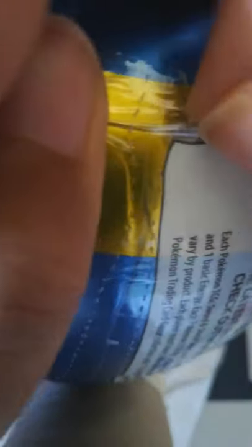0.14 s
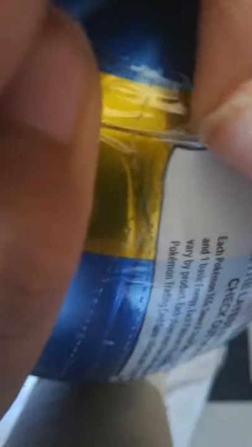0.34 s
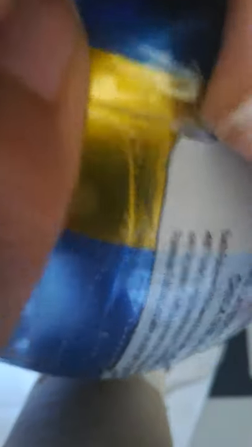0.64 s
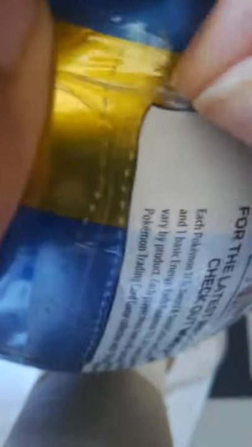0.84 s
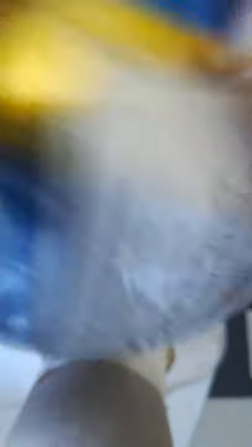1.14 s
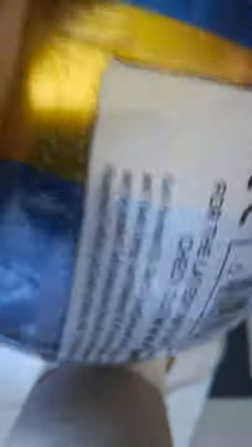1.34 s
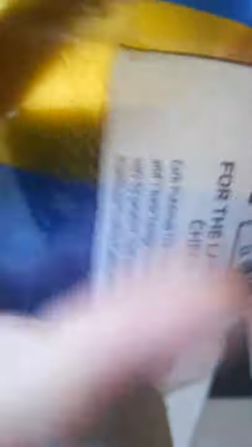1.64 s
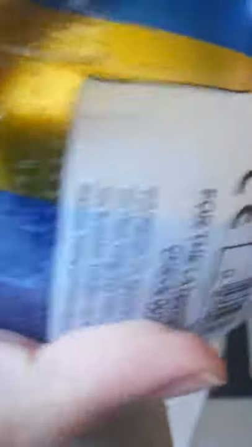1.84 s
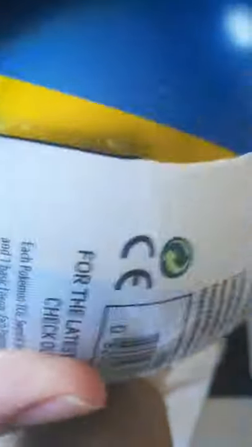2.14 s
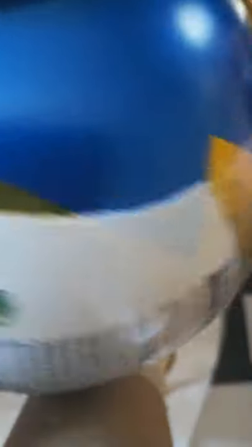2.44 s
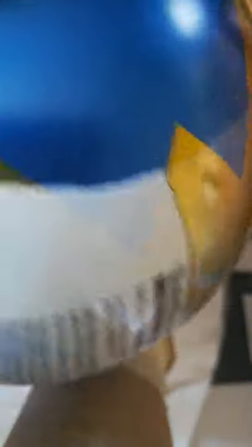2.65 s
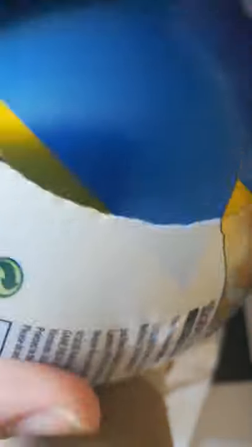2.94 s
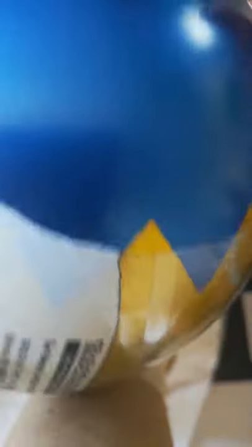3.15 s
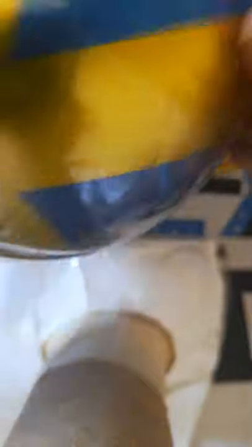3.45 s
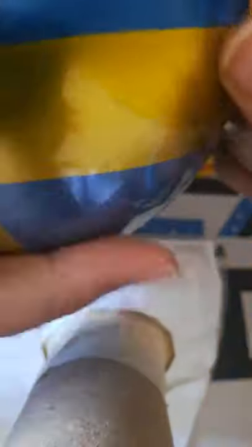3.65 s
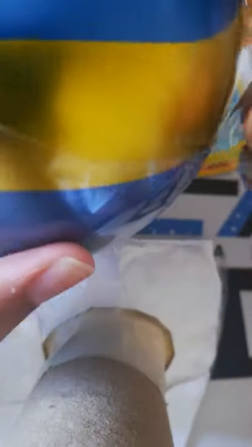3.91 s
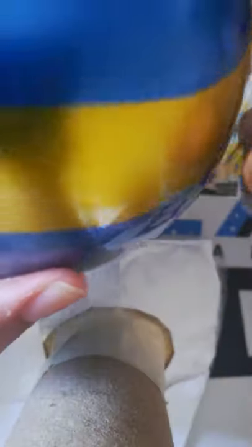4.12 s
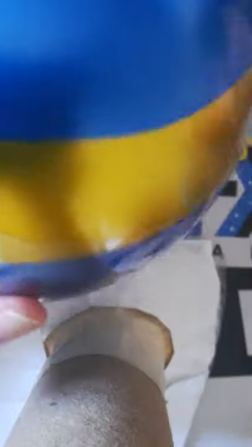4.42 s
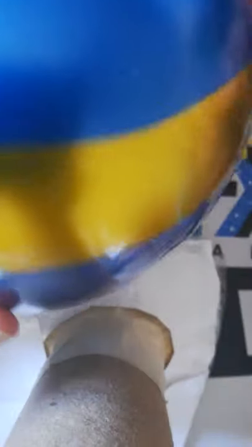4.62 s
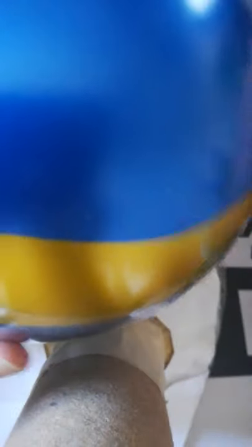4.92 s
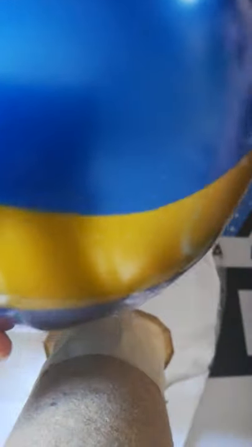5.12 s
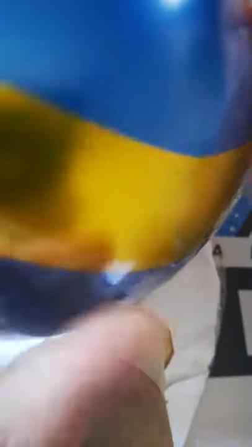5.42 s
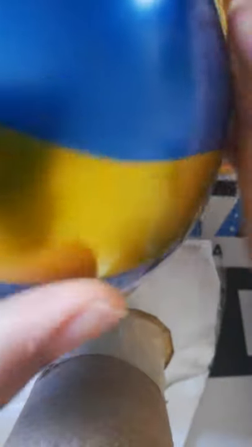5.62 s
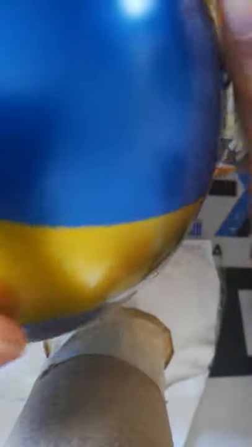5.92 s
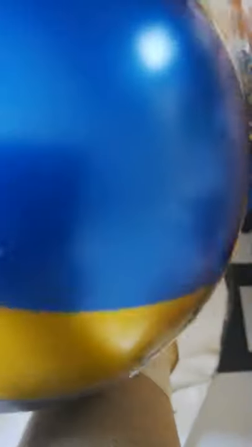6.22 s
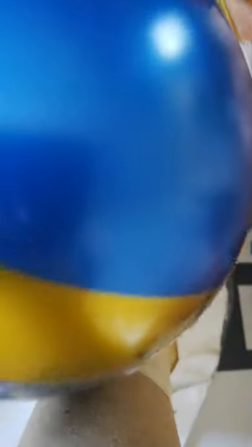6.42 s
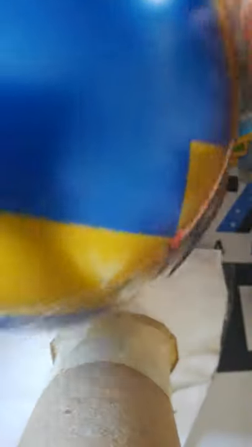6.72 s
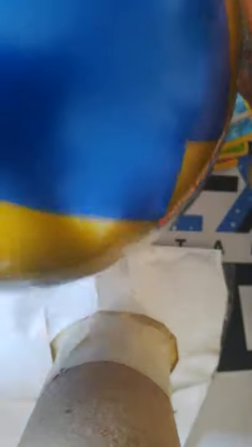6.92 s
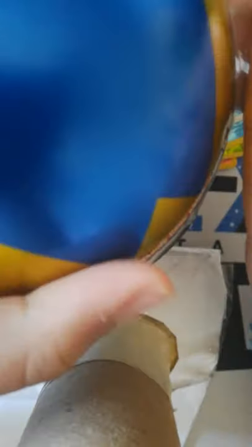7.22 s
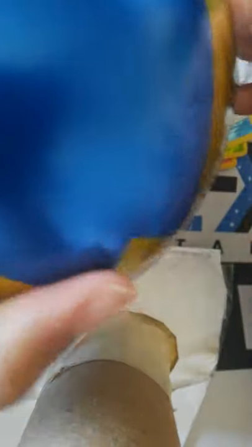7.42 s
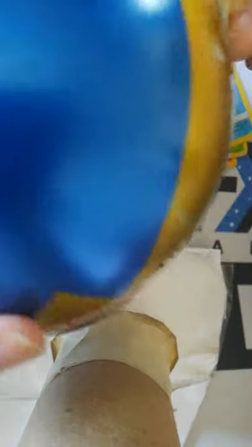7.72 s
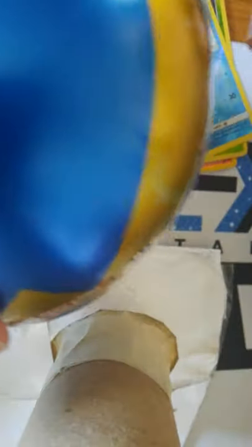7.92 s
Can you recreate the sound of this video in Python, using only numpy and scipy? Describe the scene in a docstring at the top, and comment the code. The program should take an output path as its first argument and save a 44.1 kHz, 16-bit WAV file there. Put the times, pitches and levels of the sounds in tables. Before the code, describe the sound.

Close, dry crackling of shrink wrap worked by hand on a hollow tin, sharp snaps thickening over time, ending with a deep bump.

```python
"""Stiff shrink wrap is torn and peeled off a round metal tin, close to a phone in a small room.
First sharp snaps (bursts of dense modes) break over fine crackle (ringing ticks and rubbing hiss).
Low thuds (damped sines and rough noise) soon join, and the tin rings faintly with the film (decaying modes).
From 2.4 s taut film squeaks or rasps (stick-slip pulses), then loose sheets pop (low rough rings).
Snaps crowd together from 4 s on; a deep overload thud comes at 7.6 s, over a low room noise and rumble."""
import sys
import numpy as np
from scipy import signal
from scipy.fft import rfft, irfft, next_fast_len
from scipy.io import wavfile

SR = 44100
rng = np.random.default_rng(int(sys.argv[2]) if len(sys.argv) > 2 else 0)


def wav_out(sig):
    """Save sig, one row per channel (or a flat mono array), as 16-bit PCM at SR to the path in sys.argv[1]."""
    wavfile.write(sys.argv[1], SR, np.round(np.clip(np.atleast_2d(sig).T, -1, 1) * 32767).astype(np.int16))


N = 355446
TIME = np.arange(N) / SR


def undb(db):
    """Decibels to gain."""
    return 10 ** (np.asarray(db) / 20)


def unit(x):
    """Scale to rms 1."""
    return x / np.sqrt(np.mean(x ** 2) + 1e-20)


def add(out, s, x):
    """Mix a short sound in at time s."""
    i = max(int(s * SR), 0)
    out[..., i:i + x.shape[-1]] += x[..., :N - i]


def colour(x, points, lag_s=0):
    """Shape a sound by (Hz, dB) points and delay it by lag_s."""
    size = x.shape[-1]
    fast = next_fast_len(size)
    f = np.maximum(np.fft.rfftfreq(fast, 1 / SR), 1)
    hz, db = np.transpose(points)
    gain = undb(np.interp(np.log(f), np.log(hz), db))
    delay = np.exp(-2j * np.pi * f * lag_s)
    return irfft(rfft(x, fast) * gain * delay, fast)[..., :size]


def fade(t, t60_s):
    """Exponential decay, down 60 dB after t60_s."""
    return np.exp(-np.log(1000) * t / max(t60_s, .001))


def sides(pan_db):
    """Left and right gains of equal total power, pan_db apart."""
    gain = undb(np.array([[pan_db], [-pan_db]]) / 2)
    return unit(gain)


def walk(per_second):
    """A random wander of spread 1."""
    steps = rng.standard_normal(8192)
    return unit(np.interp(TIME * per_second, np.arange(len(steps)), steps))


def peak(f, hz, height_db, width):
    """Gain of one resonance standing over a flat response; width is a share of its pitch."""
    return 1 + undb(height_db) / (1 + ((f - hz) / (width * hz)) ** 2)


def floor(air_db=-66.5, rumble_db=-70, swell_db=3):
    """Quiet room noise, alike at both ears in the bass, and the wandering rumble of holding the tin."""
    # room noise spectrum: pitch_hz, level_db (per Hz, relative)
    air_spectrum = [(12, -33.5), (20, 0.5), (55, -2.5), (124, -8), (147, -3), (351, -9), (521, -23),
                    (566, -21), (772, -22.5), (863, -25), (1350, -23.5), (1740, -25.5), (7730, -31),
                    (15200, -37.5), (16500, -54.5)]
    mid = colour(rng.standard_normal(N), air_spectrum)
    side = colour(rng.standard_normal(N), air_spectrum)
    side = colour(side, [(40, -11.0), (150, -11.5), (500, 4), (16000, -2)])
    # air_db is the level of the mid part before the last tone shaping
    air = undb(air_db) * (mid + np.array([[1], [-1]]) * side) / np.std(mid)
    air = colour(air, [(120, -4), (400, -2.0), (1000, 4.0)])
    rumble_spectrum = [(15, 2), (40, 7.0), (120, 4), (200, -15), (600, -26), (3000, -74.5)]
    rumble = unit(colour(rng.standard_normal(N), rumble_spectrum))
    return air + rumble * undb(rumble_db + swell_db * walk(18))


def room(x, wet_db=-17, t60_s=0.35, top_t60_s=0.2, build_s=0.011, echo_spread_db=2):
    """A small room: the tail builds just after each sound and its treble dies soonest."""
    # tone of the reverberation: pitch_hz, level_db (relative)
    tail_tone = [(100, -4), (500, -13.5), (1300, 2.5), (2800, 0), (3800, -0.5), (5200, 0), (6500, -1),
                 (7700, 1.5), (9500, -2), (12000, -3.5), (16000, 1)]
    t = np.arange(int(.6 * SR)) / SR
    uneven = undb(echo_spread_db * rng.standard_normal((2, len(t))))
    echoes = rng.standard_normal((2, len(t))) * uneven
    top = colour(echoes, [(7000, -41), (9000, -8.0), (11000, -6)])
    tail = (echoes - top) * fade(t, t60_s) + top * fade(t, top_t60_s)
    tail *= 1 - np.exp(-(t / build_s) ** 2)
    tail = colour(unit(tail) / np.sqrt(len(t)), tail_tone)
    return undb(wet_db) * signal.fftconvolve(x, tail, axes=1)[:, :N]


def ports(x, lag_s=0.000682):
    """Two microphone ports at opposite ends of the phone: the left faces the tin, the right hears it later."""
    # balance of the ports: pitch_hz, left_minus_right_db
    balance = [(120, 0.5), (500, 1.5), (1000, 4), (2000, 4), (4000, 4), (8000, 0.5), (13000, 4.5)]
    hz, db = np.transpose(balance)
    left = colour(x[0], np.c_[hz, db / 2])
    right = colour(x[1], np.c_[hz, -db / 2], lag_s)
    return np.array([left, right])


def thuds(rise_s=0.00059, grit=0.75):
    """Low thuds, hand bumps and deep overload pulses alike: a damped sine roughened by noise."""
    # hand bumps, and deep overload pulses at 7.58 and 7.87 s: start_s, level_db, pitch_hz
    hits = [(1.185, -36, 155), (1.21, -43.5, 153), (1.229, -44, 110), (1.698, -47, 109), (1.901, -53, 115),
            (2.104, -47.5, 117), (2.253, -53, 220), (2.809, -57, 129), (2.928, -38, 81), (3.119, -48, 106),
            (3.16, -46, 42), (3.228, -49.5, 109), (3.476, -54, 125), (3.539, -52, 124), (3.626, -52, 107),
            (4.201, -40.5, 118), (4.282, -52.5, 231), (4.495, -51.5, 217), (4.574, -53.5, 233),
            (4.773, -48, 108), (5.749, -58, 125), (6.078, -53.5, 116), (6.14, -30, 190), (6.167, -40, 69),
            (7.226, -48, 80.5), (7.339, -43.5, 78.6), (7.584, -15, 44.84), (7.698, -52, 112),
            (7.872, -32, 50)]
    # rough noise of a thud, as of skin dragging: pitch (multiple of the thud's), level_db (per Hz, relative)
    drag_tone = [(.2, -3), (1, 0), (1.33, -5), (3, -18), (20, -52)]
    # the part of the noise that differs between the ears: pitch_hz, level_db (relative)
    apart_tone = [(40, -18), (200, 3)]
    # a louder thud dies sooner: its t60 halves with every halving_db above the light one
    light_t60_s, light_db, halving_db = 0.15, -48.5, 9.5
    out, t = np.zeros((2, N)), np.arange(SR // 3) / SR
    for s, db, hz in hits:
        t60_s = light_t60_s / 2 ** ((db - light_db) / halving_db)
        apart = colour(rng.standard_normal((2, len(t))), apart_tone)
        drag = rng.standard_normal(len(t)) + apart
        drag = colour(drag, [(hz * multiple, drag_db) for multiple, drag_db in drag_tone])
        envelope = fade(t, t60_s) * (1 - np.exp(-t / rise_s))
        thud = (np.sin(2 * np.pi * hz * t) + grit * unit(drag)) * envelope
        # the level holds for the thud as if its envelope stayed at 1
        add(out, s, undb(db) * unit(thud) * np.sqrt(np.mean(envelope ** 2)))
    return out


def tin(film, ring_db=-58):
    """The film shakes the shell it is stretched over; the hands damp the ring."""
    # modes of the tin shell: pitch_hz, level_db (relative), t60_s
    modes = [(780, -6, 0.092), (870, 1.5, 0.041), (1105, 5.5, 0.12), (1270, 2, .12), (1320, -17.5, 0.19),
             (2785, -12.5, 0.074), (3700, -8.5, .1)]
    t = np.arange(SR // 3) / SR
    ring = np.zeros((2, len(t)))
    for hz, db, t60_s in modes:
        start_phase = rng.random((2, 1))
        ring += undb(db) * fade(t, t60_s) * np.sin(2 * np.pi * (hz * t + start_phase))
    return undb(ring_db) * signal.fftconvolve(film, ring, axes=1)[:, :N]


def pops(pan_db=3, rough=0.2, rise_s=0.0004):
    """A wide patch of film or tin flips, a fingertip taps, or a deep thud rings on: a brief ring at one rough
    pitch."""
    # loose sheets flipping over, fingertips tapping, and the low ring within the two deepest thuds (7.58 and
    # 7.88 s): start_s, level_db, pitch_hz, t60_s
    flips = [(2.805, -26.5, 650, 0.014), (2.936, -26.5, 455, 0.0097), (4.258, -27, 1100, 0.013),
             (4.467, -32.5, 890, 0.0067), (6.098, -34.5, 925, 0.083), (6.141, -20.5, 298, 0.02),
             (6.142, -30, 1100, 0.025), (6.197, -25.5, 785, 0.044), (6.351, -20, 860, 0.029),
             (6.379, -25, 835, 0.055), (6.586, -18.5, 990, 0.012), (7.582, -37.5, 262, 0.012),
             (7.633, -36, 530, 0.043), (7.877, -42, 336, 0.095), (7.902, -39.5, 1217, 0.045)]
    out, t = np.zeros((2, N)), np.arange(SR // 5) / SR
    for s, db, hz, t60_s in flips:
        noise = rng.standard_normal((2, len(t)))
        grit = unit(colour(noise, [(hz / 4, -20), (hz, 0), (hz * 3, -20)]))
        ring = np.sin(2 * np.pi * hz * t) + rough * grit
        envelope = fade(t, t60_s) * (1 - np.exp(-t / rise_s))
        add(out, s, undb(db) * sides(pan_db) * ring * envelope)
    return out


def squeaks(flutter_db=1.5, lift_db=2):
    """Stick-slip pulses as the film drags over the tin: even slips squeak, uneven ones rasp."""
    # taut film slides on the paint, one list a slide: time_s, slips_per_s, level_db (before the lift)
    slides = [
        [(2.40, 660, -65), (2.46, 695, -55.5), (2.56, 700, -64), (2.66, 690, -62.5), (2.73, 700, -77)],
        [(3.42, 400, -63), (3.48, 480, -60), (3.52, 730, -55), (3.6, 860, -57.5), (3.66, 870, -67)],
        [(4.28, 590, -53), (4.315, 610, -63), (4.337, 702, -45.5), (4.365, 705, -63), (4.39, 712, -53),
         (4.42, 680, -63), (4.46, 680, -51), (4.485, 720, -45.5), (4.53, 700, -69)],
    ]
    # scatter of the slip rate in each slide (share): the first and last squeak, the middle one rasps
    scatters = [.03, .14, 0.0235]
    # tone of a slip: pitch_hz, level_db (relative)
    slip_tone = [(300, -25), (700, 12), (1400, 9), (2100, 7), (2800, 5), (3500, 14), (5000, -14),
                 (12000, -39)]
    out = np.zeros(N)
    uneven, grip_db = walk(500), flutter_db * walk(90)
    for slide, scatter in zip(slides, scatters):
        s, *columns = np.transpose(slide)
        hz, db = (np.interp(TIME, s, column) for column in columns)
        cycles = np.cumsum(hz * (1 + scatter * uneven)) / SR
        # one pulse at each whole cycle
        slips = np.diff(np.floor(cycles), prepend=0)
        tone = unit(colour(slips - slips.mean(), slip_tone))
        sliding = (TIME > s[0]) * (TIME < s[-1])
        out += tone * undb(db + grip_db + lift_db) * sliding
    return out


def strain(attack_s=0.0091, sag_db_per_s=6.5, release_s=0.035, rest_db=-71):
    """How hard the fingers work the film, as a gain: each pull takes hold, slackens, then dies away."""
    # pulls of the fingers on the film: start_s (full strength), length_s, level_db (of the fine crackle)
    pulls = [(0.457, 0.036, -55), (1.206, 0.011, -36), (1.28, 0.052, -50.5), (1.69, 0.013, -58.5),
             (1.9, .06, -67), (2.082, 0.071, -41), (2.257, 0.032, -37), (2.54, 0.09, -52),
             (2.919, 0.043, -45.5), (3.073, 0.16, -52), (3.356, 0.011, -43.5), (3.446, 0.1, -48),
             (3.697, 0.073, -48.5), (4.211, 0.19, -47.5), (4.421, 0.044, -39), (4.763, 0.048, -52.5),
             (4.945, 0.017, -46.5), (5.08, 0.091, -46.5), (5.296, 0.29, -48), (5.633, 0.2, -49),
             (6.076, .16, -39.5), (6.396, 0.046, -47), (6.608, 0.11, -41.5), (6.73, 0.23, -47.5),
             (7.047, 0.013, -53.5), (7.331, 0.033, -40), (7.578, 0.12, -37.5), (7.801, 0.14, -40.5)]
    t = TIME[::32]
    # at rest in the hand the film still crackles a little
    power = np.full(len(t), undb(rest_db) ** 2)
    for s, length_s, db in pulls:
        before = np.minimum(t - s, 0)
        after = np.maximum(t - s - length_s, 0)
        edges = np.exp(before / attack_s - after / release_s)
        sag_db = sag_db_per_s * np.clip(t - s, 0, length_s)
        power += (edges * undb(db - sag_db)) ** 2
    return np.interp(TIME, t, np.sqrt(power))


def crackle(per_second=650, spread_db=4.0, grain_s=0.00045, rub_db=-5, pan_db=4, clump_db=2.5):
    """Countless tiny creases in clumps, each a broad tick with its own ring, over film rubbing on film."""
    # tone of the fine crackle: pitch_hz, level_db (per Hz, relative)
    crease_tone = [(150, -22), (400, -12.5), (900, -9), (1400, -13.5), (2200, -12), (3200, -9),
                   (4500, -8.5), (6000, -6.5), (7600, -1.5), (9000, -12), (11000, -16.5), (16000, -27.5)]
    count = 12000
    t = np.arange(128) / SR
    chance, grit = rng.random((count, 6)), rng.standard_normal((count, len(t)))
    sounding = chance[:, 0] < per_second * N / SR / count
    when, pitch, size, side, length = chance[sounding, 1:].T[:, :, None]
    hz = 1200 + 8000 * pitch
    # many weak creases, few strong ones
    strength = np.minimum(-np.log(size), 3.5)
    decay = np.exp(-t / (grain_s * (1 + length)))
    ticks = (np.sin(2 * np.pi * hz * t) + grit[sounding]) * decay * undb(spread_db * strength)
    place = ((when * N).astype(int) + np.arange(len(t))).ravel()
    grains = []
    for ear in (1, -1):
        # the ticks lean to the right
        heard = ticks * undb(ear * pan_db * (2 * side - 1.5))
        grains.append(np.bincount(place, heard.ravel(), N)[:N])
    clumped = unit(np.array(grains) * undb(clump_db * walk(70)))
    rub = undb(rub_db) * rng.standard_normal((2, N))
    return unit(colour(clumped + rub, crease_tone)) * strain()


def snap(decay_ms, ring_hz, body_hz, body_db, top_db, scatter_s=0.00018, rise_ms=0.28, shared=0.65,
         linger_db=-17, linger_ms=2, onset_db=-16, onset_ms=0.43, settle_ms=11):
    """A facet of film buckles: a burst of dense, fast-dying modes, two of which stand out."""
    # tone of the film: pitch_hz, level_db (per Hz, relative)
    film_tone = [(100, -21), (350, -10), (600, -2.5), (900, 1), (1600, 0), (2250, 5), (3000, 2.5),
                 (4200, 6), (6000, 5), (7800, 7), (9500, 4.5), (11500, -1.5), (16000, -7)]
    # a longer crease takes longer to get going: added rise as a share of its decay
    rise_share = 0.041
    # a clean, short snap rings most: the ring loses height with each doubling of the decay
    ring_db, ring_loss_db, ring_width = 11, 2, .07  # height at a decay of 1 ms
    body_ring_db, body_width = 9, .14
    ms = (np.arange(1024) - 128) / SR * 1000
    f = np.fft.rfftfreq(len(ms), 1 / SR) + 1
    after, decay_ms = np.maximum(ms, 0), max(decay_ms, .3)
    # the crease runs and stops; the sheet around it flutters a little longer
    envelope = np.exp(-after / decay_ms) + undb(linger_db) * np.exp(-after / linger_ms)
    envelope *= 1 - np.exp(-after / (rise_ms + rise_share * decay_ms))
    envelope *= np.exp(-(after / settle_ms) ** 2)
    # a faint soft onset around each snap's start
    envelope += undb(onset_db) * np.exp(-abs(ms) / onset_ms)
    noise = rng.standard_normal((3, len(ms)))
    # part of the burst is common to both ears
    burst = np.sqrt(shared) * noise[0] + np.sqrt(1 - shared) * noise[1:]
    spectrum = rfft(burst * envelope)
    spectrum *= undb(np.interp(f, *np.transpose(film_tone)))
    spectrum *= peak(f, body_hz, body_ring_db, body_width)
    spectrum *= peak(f, ring_hz, ring_db - ring_loss_db * np.log2(decay_ms), ring_width)
    # body_db and top_db set how each snap's energy is shared between body, main and top ranges;
    # the main range gets the energy of a level of 1 held for 1 ms
    edges_hz = [500, 3300, 10000, 16000]
    power = np.mean(abs(spectrum) ** 2, axis=0) * 2 / len(ms) / (SR / 1000)
    have_db = []
    for low, high in zip(edges_hz, edges_hz[1:]):
        have_db.append(10 * np.log10(power[(f >= low) & (f < high)].sum()))
    corners_hz = [500, 3000, 3700, 9400, 10600, 16000]
    change_db = np.array([body_db, 0, top_db]) - have_db
    spectrum *= undb(np.interp(f, corners_hz, np.repeat(change_db, 2)))
    # each facet lies at its own place on the tin, so the right ear's delay varies
    spectrum[1] *= np.exp(-2j * np.pi * f * scatter_s * rng.uniform(-0.76, 1))
    return irfft(spectrum)


def snaps():
    """The snaps of the wrap, loud and faint: facets buckling one by one, each at its own side."""
    # snaps and faint ticks: start_s, level_db (3-10 kHz), decay_ms (0.3 at least is used), ring_hz, body_hz,
    # body_db and top_db (both against the level), left_minus_right_db
    facets = [(0.5956, -12.5, 0.26, 8180, 2960, -22.5, -12.5, -2),
              (0.9086, -35.5, 0.58, 7150, 880, -22, -18, 3), (1.1828, -13, 0.34, 7400, 3190, -15, -15, 5.5),
              (1.2111, -29.5, 7, 4600, 2580, -10, -2.5, 16),
              (1.2784, -13.0, 0.33, 8160, 2060, -10.5, -16, 7),
              (1.417, -40.0, 0.47, 9300, 2770, -7, -14, 5), (1.4813, -16, 0.34, 8170, 2170, -9, -20.5, 3.5),
              (1.8971, -35.5, 5.1, 7250, 3260, -3.5, -16, 5),
              (1.917, -34.5, 0.97, 6860, 2380, -7.5, -21, 12),
              (1.9364, -28, 0.6, 9800, 1630, -4.5, -7, 8.5),
              (1.97, -45.5, 1.2, 7960, 1210, -22, -9.5, 11.5),
              (2.0698, -33, 2.8, 6500, 2390, -5.5, -7.5, 21), (2.082, -27, 1.9, 6900, 2430, -25, -10, -0.5),
              (2.0876, -18, 0.41, 7450, 1030, -29, -14, -4), (2.108, -6, 1.3, 7620, 2450, -13, -13, 6),
              (2.2513, -21, 2.6, 4700, 2690, -22, -12, 5), (2.256, -19.5, 1.3, 4330, 2120, -4.5, -26, 36),
              (2.2652, -15.5, 1.4, 7550, 2690, -10.5, -6.5, -2), (2.286, -20, 3.1, 4600, 2300, -3, -28, 4),
              (2.3621, -36.0, 0.74, 7400, 1300, -3, -16, 6),
              (2.4991, -16.5, 1.1, 7050, 1190, -15, -2.5, -2),
              (2.5859, -25.5, 1.2, 7400, 2950, -25, -17, 3), (2.6303, -35.5, 2, 7140, 690, -26, -9, 2),
              (2.7518, -28, 0.6, 7970, 970, -16.5, -26, 0), (2.9091, -17, 2.2, 8180, 630, -15, -20.5, 1.5),
              (2.9348, -38, 2.7, 7700, 600, 4.5, -28, 4), (3.0612, -37.5, 0.7, 4850, 3220, -6, -13, -3),
              (3.1194, -33.5, 5.2, 6600, 2470, -2.5, -8, -2), (3.224, -46, 1.7, 5940, 2630, -9, -13, 7),
              (3.276, -40.5, 1.1, 9800, 600, -26, -9, -3), (3.3676, -27.5, 13, 8800, 1930, -14.5, -8.5, 18),
              (3.418, -30.5, 1.5, 7300, 1810, -22, -14, 3), (3.4236, -25.0, 1.2, 8500, 930, -35, -13, -12),
              (3.456, -18.0, 0.33, 8540, 2740, -30, -11, -1),
              (3.5484, -14.5, 0.57, 6260, 2540, -15, -12.5, -1),
              (3.7083, -22, 0.9, 8450, 3100, -36.5, -11, -2), (3.7235, -20, 1.2, 4900, 2560, -4.5, -20, 4),
              (3.7442, -21.5, 0.7, 5830, 2670, -27, -17, -11),
              (3.7601, -14.5, 0.75, 6300, 2240, -14.5, -12.5, -1.5),
              (3.777, -22, 7.5, 4750, 1000, -11.5, -26, 2), (3.931, -30.5, 1.7, 7360, 3000, -26, -13, -8),
              (4.107, -45.5, 1, 4000, 800, -0.5, -16, -8.5),
              (4.1985, -7, 1.1, 7360, 2170, -13, -16.5, -0.5), (4.2118, -28, 0.6, 5940, 1080, -6, -1, -1),
              (4.2192, -11.5, 5.7, 5200, 1270, -14, -13, -25),
              (4.2249, -11.5, 1.4, 5150, 1260, -16.5, -17, 22), (4.2392, -21, 1.3, 8250, 3060, -14, -14, 3),
              (4.3491, -22.5, 0.53, 7600, 2170, -12.5, -18, -1.5),
              (4.4228, -23, 5.1, 7100, 2740, -14, -15, -3.5), (4.4487, -24, 4.7, 6900, 3120, -10, -14, -9),
              (4.4652, -21.5, 3.3, 7200, 930, -5.5, -17, 2.5),
              (4.4751, -22.5, 3.4, 7000, 1380, -15, -19, -24),
              (4.498, -15, 1.1, 7500, 1990, -7.5, -12, -6.5), (4.5819, -33, 9, 4160, 600, -2, -25, -3),
              (4.6146, -32, 1.1, 7360, 920, -8, -19, -7), (4.6635, -29, 0.54, 6960, 960, -12.5, -35, 4),
              (4.7083, -34.5, 2.5, 6400, 3190, -15, -28, -10),
              (4.7689, -21.5, 0.83, 7300, 696, -18, -11, -14),
              (4.7762, -17.5, 3.9, 7500, 3300, -12.5, -16, 7),
              (4.7811, -8.5, 3.8, 6850, 3150, -17, -15.5, -6.5),
              (4.879, -18.0, 1.4, 5020, 2100, -18.5, -31, -4.5),
              (4.964, -13, 3.3, 6720, 2440, -8, -24, -1.5), (4.9768, -22.5, 0.5, 4760, 3190, -30, -22, 1),
              (4.9874, -24.5, 0.51, 6340, 2560, -15, -12, -13), (4.9957, -30, 4.3, 6200, 2630, -2, -16, -3),
              (5.0961, -13.5, 1.6, 7630, 2890, -19, -14.5, -1),
              (5.107, -23, 1.6, 3560, 3050, -12, -19, -10), (5.1257, -12.5, 2.4, 6540, 2500, -19, -15, 6),
              (5.135, -21.5, 3.3, 6900, 2710, -19, -11, -9), (5.1981, -20.5, 1.1, 7140, 2730, -12, -27, -2),
              (5.216, -31.5, 1.2, 6200, 2970, -17, -18, 0), (5.2547, -30.5, 1.6, 6750, 2820, -27, -24, -4),
              (5.2752, -22, 1.5, 7240, 2520, -16.5, -18, -4), (5.3086, -31, 0.6, 8000, 2370, -31, -13, -20),
              (5.324, -14, 3.1, 5500, 2360, -18, -27, -3.5),
              (5.4507, -5.0, 0.62, 5280, 3300, -26.5, -14.5, -3),
              (5.503, -20.0, 1.7, 7700, 2800, -17, -17, -5), (5.585, -16.5, 0.23, 5120, 2950, -15, -29, 1),
              (5.659, -27, 0.57, 5070, 1150, -7, -35, -11), (5.6945, -24, 1.4, 7500, 1090, -18, -27, 2),
              (5.728, -14.5, 1.4, 7300, 2430, -12.5, -24, -2.5),
              (5.7515, -19, 1.7, 4540, 2400, -6, -18, -2.5),
              (5.7703, -20, 7.6, 6700, 2450, -8.5, -27, -3.5),
              (5.7878, -23, 1.4, 4600, 3000, -15, -5.5, 4.5),
              (5.8745, -27.0, 0.9, 5570, 2630, -18, -24, -4.5),
              (5.9841, -28.5, 0.91, 8060, 3340, -21.5, -20, 4),
              (6.05, -30.5, 1.3, 6900, 3200, -21, -20, -9), (6.068, -26.5, 2.2, 5000, 1310, -16, -18, 13),
              (6.0734, -16.5, 1.5, 6900, 1290, -18, -21, -3.5), (6.0965, -19, 2.0, 8450, 840, -9, -13, 2.5),
              (6.1249, -23.5, 3, 6760, 675, -3.5, -6, 1), (6.1398, -19.5, 3.8, 6600, 564, 2.5, -26, -4.5),
              (6.1965, -7.5, 2.3, 6900, 780, -15, -21.5, -2), (6.351, -14.5, 1.5, 6830, 820, -8.5, -31, 0),
              (6.3753, -9.5, 3.1, 7130, 865, -12.5, -21, -5.5), (6.5852, -20, 4.8, 4640, 990, -2, -23, 1),
              (6.6072, -5.5, 1.7, 6740, 1730, -19.5, -19.5, -3.5),
              (6.644, -18.5, 1.8, 6200, 3240, -15.5, -19, -2), (6.6657, -16, 0.27, 6600, 2170, 0, -28.5, 2),
              (6.6895, -26.5, 2, 6900, 2690, -13, -19, -1.5),
              (6.699, -22.5, 2.5, 6500, 2820, -14, -17.5, -6), (6.748, -21, 0.9, 6770, 670, -29, -20, -6),
              (6.7577, -2.5, 3.7, 7600, 2380, -15.5, -18, 1),
              (6.7723, -24.5, 1.4, 7100, 960, -25.5, -7.5, -3),
              (6.8435, -9.5, 2.1, 7400, 3120, -19, -20, 2.5),
              (6.8893, -17, 1.9, 7300, 3270, -11.5, -26, 1.5), (7.0971, -40, 2.5, 4700, 946, 1, -25.5, -4),
              (7.2105, -43, 4.8, 6600, 2650, 2.5, -20, 1), (7.243, -42, 1.8, 3470, 2610, -4, -25, 2),
              (7.285, -12, 2.9, 7500, 2930, -12.5, -21, -0.5), (7.3349, -26, 1.5, 6700, 1310, -5.5, -20, 9),
              (7.3382, -11.5, 2.1, 7250, 1310, -45, -14.5, -8),
              (7.346, -23, 2.7, 6050, 1040, -5.5, -7, -0.5),
              (7.3656, -20.5, 8.2, 6200, 880, -15.5, -16, -8), (7.373, -19, 1.7, 5700, 950, -15, -14.5, 2),
              (7.563, -15, 1.9, 8700, 2840, -18, -9.5, 6.5),
              (7.5828, -5.5, 3.4, 4860, 2900, -9.5, -13, -0.5),
              (7.617, -21.5, 1.9, 4560, 584, -8.5, -15, 4), (7.6528, -15, 2.2, 4970, 920, -17, -10, 6),
              (7.768, -27.0, 6.2, 7700, 1880, -13, -15, -1), (7.8461, -14, 2, 6650, 2960, -6.5, -10.5, 1),
              (7.8609, -16.5, 0.5, 8900, 890, -8, -10, 11), (7.8733, -8.5, 3.4, 5300, 2420, -11, -10, 2),
              (7.9717, -31.5, 2.5, 7000, 2670, -6.5, -8, 2)]
    out = np.zeros((2, N))
    lead_s = 128 / SR  # the onset ahead of each snap
    for s, db, *facet, pan_db in facets:
        add(out, s - lead_s, undb(db) * sides(pan_db) * snap(*facet))
    return out


def scene():
    """Film, tin and thuds in the room."""
    film = snaps() + crackle() + pops() + squeaks()
    near = film + tin(film) + thuds()
    return ports(near) + room(near) + floor()


def record(dry, top_hz=16300):
    """Peaks beyond full scale are clipped; the phone cuts the top."""
    low_pass = signal.ellip(8, .1, 60, top_hz, fs=SR, output="sos")
    return signal.sosfiltfilt(low_pass, np.clip(dry, -1, 1))


dry = scene()
out = record(dry)
wav_out(out)
```